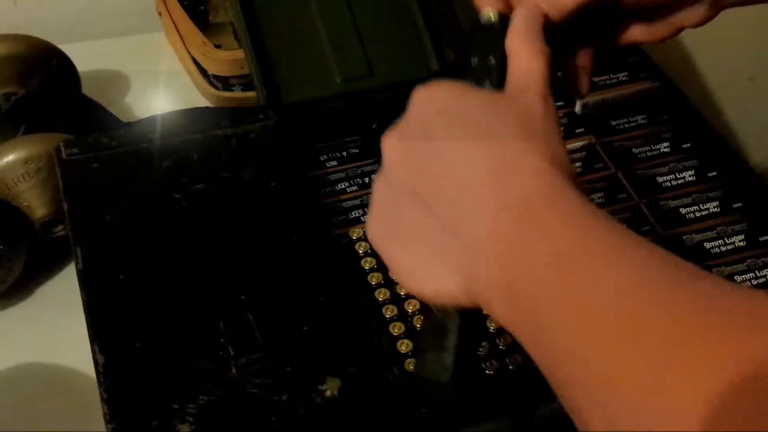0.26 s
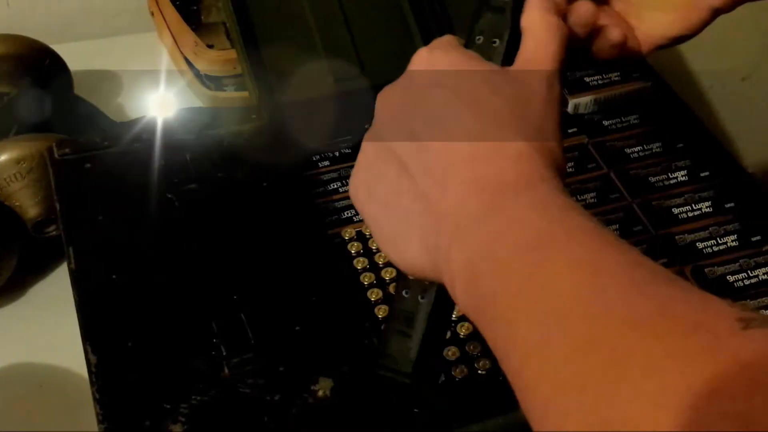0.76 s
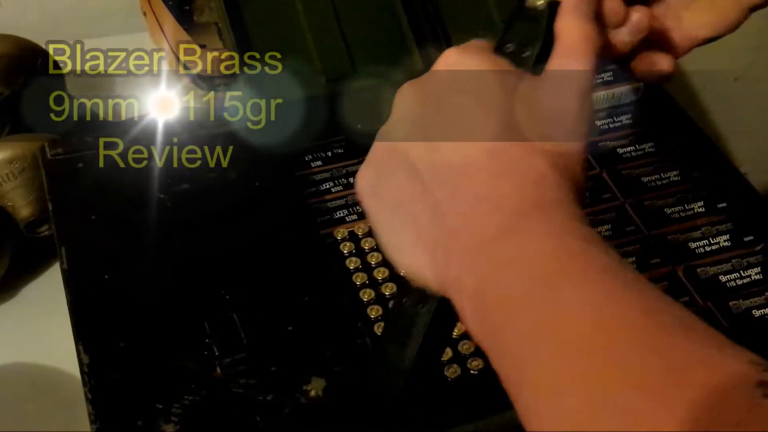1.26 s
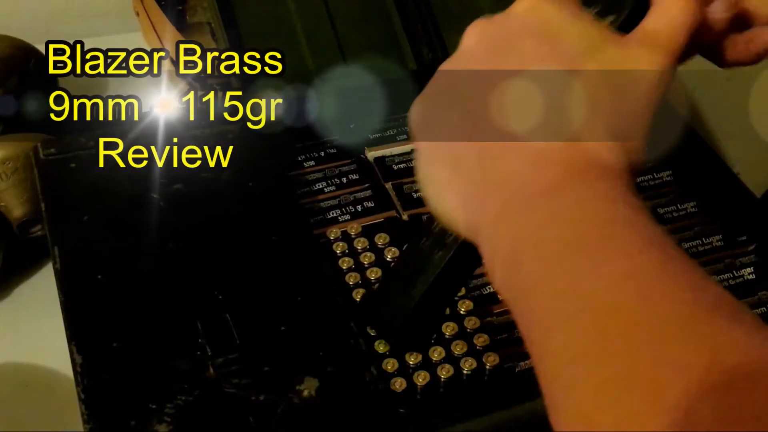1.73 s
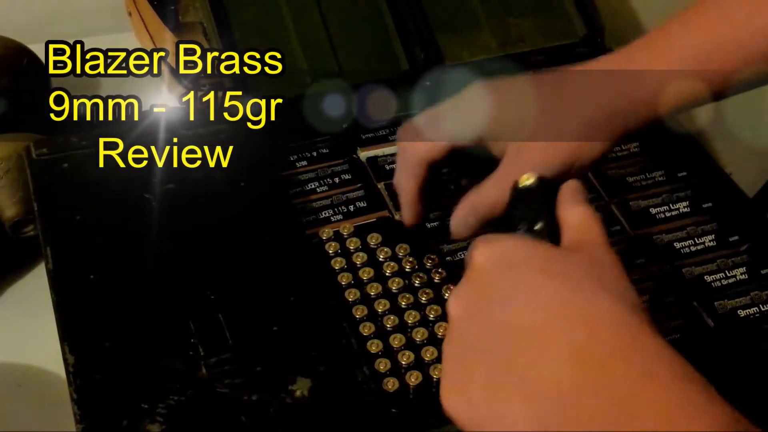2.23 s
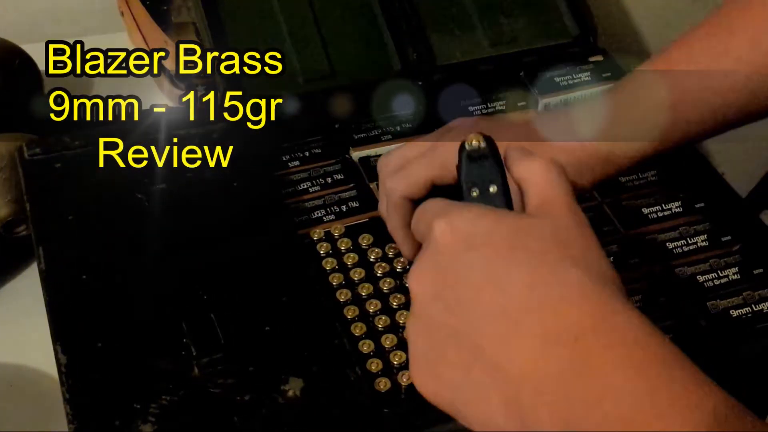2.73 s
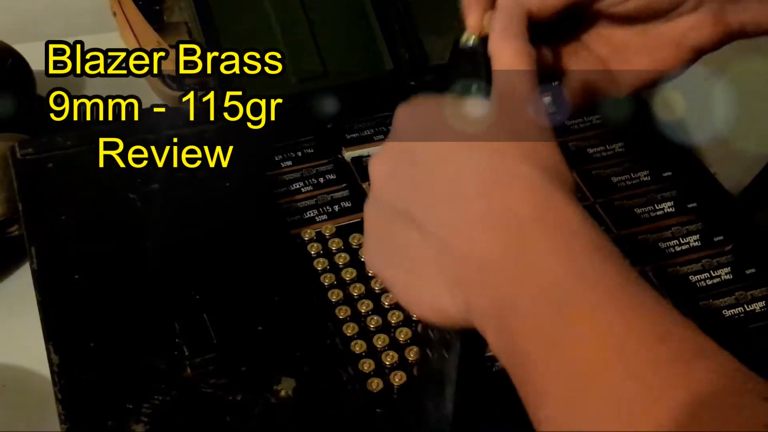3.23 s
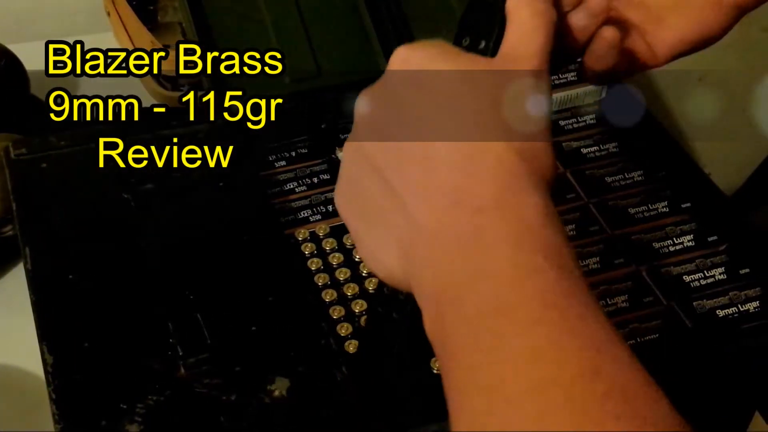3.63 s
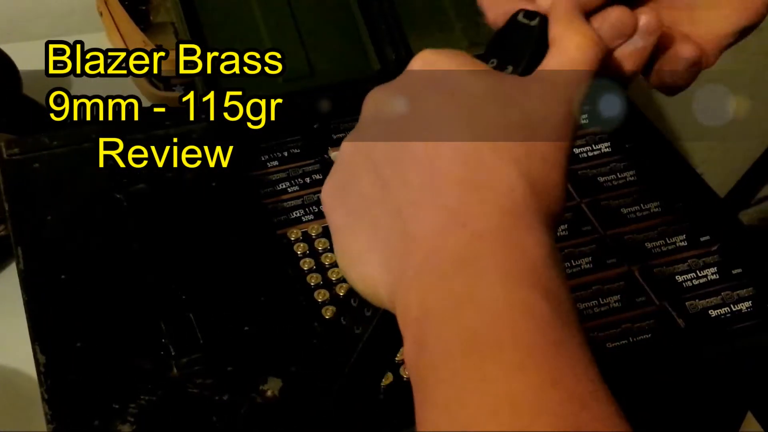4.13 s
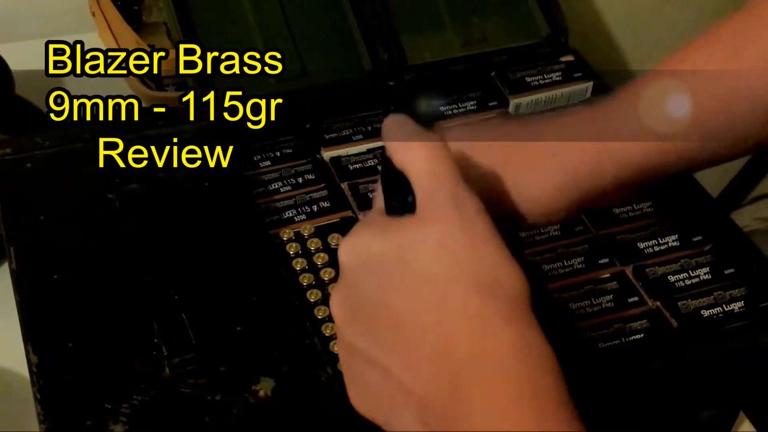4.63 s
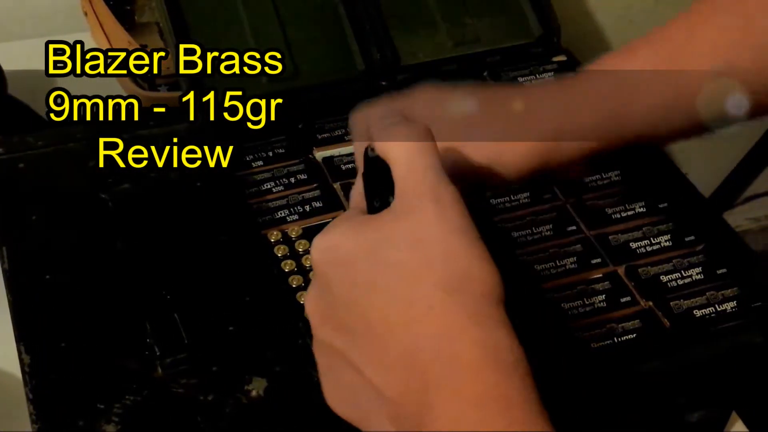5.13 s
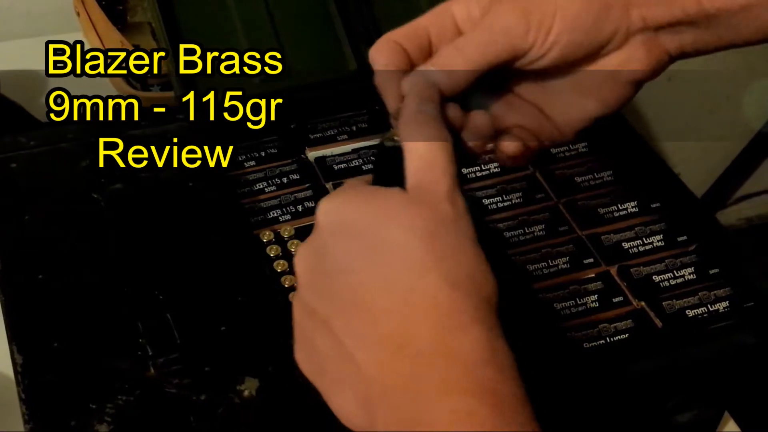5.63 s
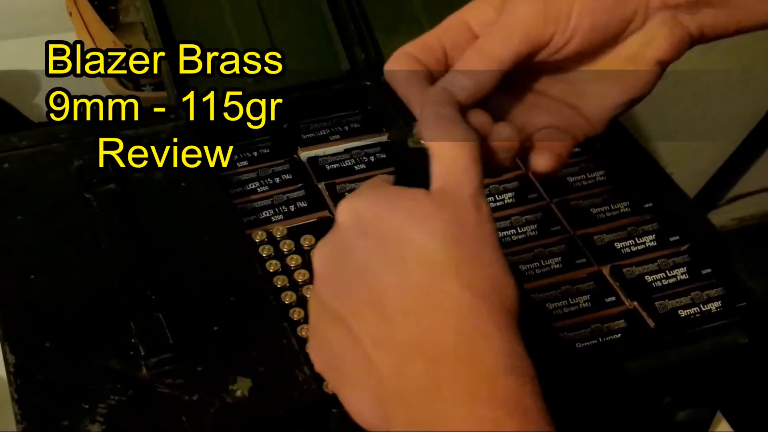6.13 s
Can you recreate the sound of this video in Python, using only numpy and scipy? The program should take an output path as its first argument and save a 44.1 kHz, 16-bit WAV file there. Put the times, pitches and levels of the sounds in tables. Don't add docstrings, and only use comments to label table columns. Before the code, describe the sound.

Brass cartridges are picked from a plastic tray and snapped into a steel pistol magazine, with irregular sharp clicks, small scrapes and short room echo.

```python
import sys
import numpy as np
from scipy import signal
from scipy.fft import rfft, irfft, next_fast_len
from scipy.io import wavfile
from scipy.ndimage import uniform_filter1d, map_coordinates

SR = 44100
rng = np.random.default_rng(int(sys.argv[2]) if len(sys.argv) > 2 else 0)


def generate_wav(sig):
    pcm = np.round(np.clip(np.atleast_2d(sig).T, -1, 1) * 32767).astype(np.int16)
    wavfile.write(sys.argv[1], SR, pcm)


def linear_from_db(decibels):
    return 10 ** (np.asarray(decibels, float) / 20)


N = 280961
PLACES = 6
BODY_HZ = 2300

# frequency in Hz, level in dB.
THUD = [(150, -25.5), (280, 0.5), (600, 0.5), (1250, -5), (1650, -22), (2500, -61.5)]
# frequency in Hz, level in dB.
BODY = [(900, -23.5), (1400, -13), (1900, -9.5), (2300, 0), (2800, -8), (3500, -11.5), (4500, -41.5),
        (7000, -68.5)]
# frequency in Hz, level in dB.
WALLS = [(2000, -58.5), (2900, -7), (3450, -0.5), (4300, 0), (5000, -1), (5700, -4.5), (6500, -8),
         (9000, -60.5)]
# frequency in Hz, level in dB.
BRIGHT = [(4000, -57), (5500, -3), (6300, -1.5), (7400, 0), (8600, 1.5), (9700, -1.5), (10800, -11.5),
          (12200, -25), (14000, -69)]


def unit(x):
    return x / np.sqrt(np.mean(x ** 2) + 1e-20)


def along(points, hz):
    f, v = np.transpose(points)
    return np.interp(np.log(hz + 1), np.log(f + 1), v)


def filtered(x, response):
    m = next_fast_len(x.shape[-1] + 8192)
    return irfft(rfft(x, m) * response(np.fft.rfftfreq(m, 1 / SR)), m)[..., :x.shape[-1]]


def paired(pair, alike):
    turn = lambda hz: np.arccos(np.clip(along(alike, hz), 0, 1)) / 2
    mid, side = filtered(pair, lambda hz: np.array([np.cos(turn(hz)), np.sin(turn(hz))]))
    return np.array([mid + side, mid - side])


def causal(gain):
    c = irfft(np.log(gain + 1e-6))
    half = c.shape[-1] // 2
    folded = np.concatenate([c[..., :1], 2 * c[..., 1:half], 0 * c[..., half:]], axis=-1)
    return np.exp(rfft(folded))


def contacts():
    # start in seconds, body level in dB,
    # walls over body in dB, hardness in dB, body pitch in Hz.
    first_round = [(0.432, -44, 3, 0.5, 2050), (0.5753, -46.5, 6, 6.5, 2140), (0.6225, -41.5, -7, -7, 3050),
                   (1.6214, -42, 5, 7.5, 2720), (1.656, -28.5, -5.5, 0.5, 2777),
                   (1.6697, -28, -0.5, 7.5, 2637), (1.842, -42.5, -16.5, 7, 2640),
                   (1.8514, -30.5, -0.5, 6, 2042), (1.9155, -51.5, 10.5, 15.5, 2570),
                   (1.9212, -32.5, -6, 1, 2600), (2.053, -35.5, 5, -4.5, 2560),
                   (2.0571, -36.5, -2.5, 13, 2716), (2.061, -39.5, -25.5, -24.5, 2826)]
    next_rounds = [(3.2614, -45.5, 2, 6.5, 2090), (3.3225, -46.5, -5, -5, 2196), (3.918, -55, 0, -7, 2430),
                   (3.943, -54, 11, 14.5, 3150), (3.9615, -57, 1.5, 14, 2407),
                   (4.277, -46.5, 8.5, 15, 2160), (4.3336, -36, -6, 4, 2310),
                   (4.3365, -34.5, 0, 11.5, 2620), (4.3405, -37.5, 2.5, 6.5, 2758),
                   (4.3422, -28, -6, 12.5, 2600), (4.35, -47.5, -1.5, 13, 2150),
                   (4.4286, -26.5, 0, 0, 2730), (4.5589, -37, 2, -7.5, 2750), (5.247, -89, 27, 23.5, 2195),
                   (5.6041, -50, 3, 13.5, 2710), (5.6029, -42, -12.5, 3, 2700),
                   (5.7346, -78.5, 8, 13, 1960)]
    # start in seconds, body level in dB,
    # hardness in dB, body pitch in Hz.
    picks = [(2.675, -56.5, -32.5, 2030), (2.6867, -52.5, -34.5, 2080), (2.691, -45, -21, 2100),
             (2.7958, -57, -38, 2160), (2.8002, -49.5, -44, 1920), (2.8061, -45, -42, 2160),
             (2.8164, -49, -26, 2220), (2.821, -47.5, -19, 2031), (2.9373, -42, -30, 2000),
             (2.9413, -36.5, -11, 2084), (2.9458, -36.5, -35, 2087), (4.7358, -52, -3.5, 2460),
             (4.739, -46.5, -7, 1820), (4.7614, -34.5, -32, 2120), (4.8914, -43, -28, 1745),
             (4.8959, -40.5, -46, 2360), (4.9018, -36.5, -58, 2230), (4.9238, -36.5, -40, 2090),
             (4.9292, -37, -38, 1980), (4.9327, -40, -15, 2310), (4.9788, -58.5, -18, 2136),
             (5.001, -56.5, -27, 2370), (5.0308, -47, -23, 2230), (5.099, -40, -12, 1540),
             (5.1019, -35, -10.5, 2570), (5.1064, -35, -23, 2510), (5.1099, -39, -38, 1830),
             (5.1159, -34, -17, 1970), (5.1453, -64, 0, 2210)]
    ticks = [(.3114, -61, -11, 1940), (.427, -87, 16, 3000), (.6275, -59, -7, 1890),
             (.6315, -44.5, -14, 1980), (.806, -49.5, -14.5, 2150), (.8938, -56.5, -30, 2040),
             (1.116, -64.5, -3, 2140), (1.1549, -60, -34, 1950), (1.3373, -64, -34, 2710),
             (1.3553, -65, -30, 1850), (1.5202, -77, -29.5, 2690), (1.5321, -57, -41, 2390),
             (1.6795, -41, -1, 2640), (1.8358, -50, 3, 2760), (1.9305, -36.5, -17, 3320),
             (2.045, -75, 3, 2115), (2.5, -66, -31, 2000), (2.5125, -57.5, -41.5, 1900),
             (2.5395, -62, -57, 2070), (2.5545, -75, -47, 2350), (3.938, -50, -6, 2682),
             (3.9404, -71, -1, 2630), (4.0573, -70, 3, 2472), (4.0881, -52.5, -9, 2470),
             (4.1576, -70, -13, 2120), (4.1778, -52, -11.5, 2550), (5.6016, -76, -15, 2670),
             (6.1173, -58.5, -21, 2603), (6.1606, -51, -15, 2446)]
    # start in seconds, thud level in dB.
    bumps = [(0.313, -57), (1.0756, -58.5), (1.6693, -44.5), (1.8359, -48.5), (2.0554, -52.5),
             (2.4189, -64), (2.67, -59), (2.691, -59), (2.778, -59.5), (3.9404, -62.5), (4.068, -55.5),
             (4.279, -48.5), (4.3355, -49.5), (4.7361, -46), (4.74, -46), (4.7633, -54), (4.8911, -59.5),
             (5.0948, -47), (5.099, -60)]
    snap_thud_db, pick_thud_db, tick_thud_db = -30.5, -17.5, -18
    pick_walls_db, tick_walls_db = 2, -2
    walls_follow = 0.39
    bump_body_db, bump_hard_db = -3.5, -21

    rows = []
    for s, db, walls_db, hard_db, hz in first_round + next_rounds:
        rows.append((s, db + snap_thud_db, db, walls_db, hard_db, hz))
    for table, thud_db, walls_db in ((picks, pick_thud_db, pick_walls_db), (ticks, tick_thud_db, tick_walls_db)):
        for s, db, hard_db, hz in table:
            rows.append((s, db + thud_db, db, walls_db + walls_follow * hard_db, hard_db, hz))
    for s, db in bumps:
        rows.append((s, db, db + bump_body_db, bump_hard_db / 2, bump_hard_db, BODY_HZ))
    s, thud_db, body_db, walls_db, hard_db, hz = np.transpose(rows)
    return s, thud_db, body_db, body_db + walls_db, body_db + hard_db, hz


def clicks():
    # frequency in Hz, level in dB.
    edge = [(9000, -58), (11000, -4), (12000, -3), (13800, -8.5), (15300, -6.5), (16200, -20.5),
            (16600, -59.5), (18000, -95.5)]
    rattle_t60 = [0.04, 0.0019, 0.012, 0.0071, 0.003]
    ring_to_walls_db = -7.5
    s, thud_db, body_db, walls_db, bright_db, body_hz = contacts()
    edge_db = bright_db - 13 + .9 * np.minimum(bright_db + 22, 0)
    level = linear_from_db(np.array([thud_db, body_db - 2, walls_db, bright_db, edge_db]).T)

    lead, size = 128, 1536
    t = (np.arange(size) - lead).clip(0) / SR
    hz = np.fft.rfftfreq(size, 1 / SR)
    colour = linear_from_db([along(part, hz) for part in (THUD, BODY, WALLS, BRIGHT, edge)])
    colour = np.repeat(colour[None], len(s), axis=0)
    colour[:, 1] = linear_from_db(along(BODY, np.outer(BODY_HZ / body_hz, hz)))

    chatter = linear_from_db(-23.5 - 60 * t / 0.09)
    decay = linear_from_db(-60 * t / np.array(rattle_t60)[:, None]) + chatter
    fade = decay * (1 - np.exp(-t / 0.0002)) * (t < .03)
    noise = rng.standard_normal((len(s), 4, 5, size)) * fade
    parts = irfft(rfft(noise) * causal(colour)[:, None], size)
    parts /= np.sqrt(np.sum(parts ** 2, -1, keepdims=True) / 130)
    rattle = np.einsum("ep,edpt->edt", level, parts)

    ring = np.sin(2 * np.pi * np.outer(body_hz, t)) * linear_from_db(-60 * t / .015) * (1 - np.exp(-(t / .0006) ** 2))
    ring = linear_from_db(body_db + 1.5)[:, None] * ring
    heard = linear_from_db(ring_to_walls_db * np.array([0, 1, 1, 1]))[:, None]
    blows = rattle + ring[:, None] * heard

    near, to_room = np.zeros(N + SR), np.zeros((PLACES, N + SR))
    for k, start in enumerate(np.round(s * SR).astype(int) - lead):
        near[start:start + size] += blows[k, 0]
        to_room[(k + np.arange(3)) % PLACES, start:start + size] += blows[k, 1:] / np.sqrt(3)
    return near[:N], to_room[:, :N]


def rings():
    snap_s = [
        1.6699,
        4.3424,
    ]
    # frequency in Hz, level in dB, t60 in seconds.
    snap_modes = [
        [(7600, -16, 0.011), (6500, -10, 0.0035), (10200, -13, .01), (2550, -32.5, 0.034), (5030, -27, .015), (8190, -21, .015), (3600, -22.5, 0.022), (12200, -23, 0.0081), (2160, -33.5, 0.01973), (14480, -30, .005)],
        [(9700, -7, 0.01294), (6170, -13, 0.011), (8420, -15, .018), (7400, -12.5, .008), (2182, -32.5, 0.032), (2750, -23.5, 0.036), (2688, -37, 0.23), (4287, -36.5, .2), (4290, -24.5, 0.024), (11900, -14, 0.0047), (15000, -22, .005), (3500, -28, 0.009)],
    ]
    # start in seconds, frequency in Hz, level in dB, t60 in seconds.
    free_rings = [(.4312, 3420, -46, 0.038), (.4312, 4170, -36, 0.02), (0.4315, 5870, -34, 0.016),
                  (0.576, 3500, -36, 0.028), (0.624, 1940, -39.5, 0.048), (0.622, 2760, -44, 0.1),
                  (.806, 5630, -53, 0.013), (1.118, 3500, -64, 0.098), (1.153, 3500, -59, 0.035),
                  (1.56, 5650, -54, .025), (1.8513, 3500, -19, 0.0099), (2.061, 3550, -36.5, 0.1),
                  (2.9408, 2116, -13, 0.0063), (2.9463, 1870, -35.5, 0.048), (3.262, 2825, -30, 0.012),
                  (3.262, 3350, -34, 0.015), (3.3235, 5400, -43.5, .015), (5.6039, 2690, -27, 0.024),
                  (5.604, 5510, -28, 0.013), (5.6047, 2220, -33, 0.015), (5.6042, 3570, -53, 0.013),
                  (5.604, 6170, -25.5, 0.012), (5.6042, 8660, -28.5, 0.0097)]
    brass_modes = [(.431, 7300, -26.5, 0.0064), (0.432, 1930, -63, 0.026), (0.43, 2660, -45, 0.033),
                   (0.5746, 8280, -34, .012), (0.624, 3740, -35.5, 0.015), (0.624, 4540, -40, 0.022),
                   (1.622, 6500, -28, 0.014), (1.622, 3800, -42, .012), (1.6546, 7300, -19, 0.018),
                   (1.6565, 9100, -29, .012), (1.8515, 9450, -10, 0.007), (1.8504, 6050, -44, 0.012),
                   (1.8535, 2660, -31, 0.023), (1.8605, 2150, -36, .03), (1.9225, 3480, -27, 0.028),
                   (1.923, 2540, -31, .025), (1.9225, 5070, -29, 0.018), (1.9305, 2070, -33, 0.024),
                   (2.052, 7600, -31, .012), (2.052, 4430, -41, 0.011), (2.0565, 7400, -20, 0.013),
                   (2.0568, 9000, -34, .012), (2.057, 8670, -16.5, 0.017), (2.061, 5900, -30, 0.017),
                   (2.0458, 10820, -34.5, .01), (3.2615, 2130, -44.5, .025), (3.2615, 6060, -39, .015),
                   (3.2608, 8670, -37, .012), (3.2611, 4970, -43, .015), (3.9428, 6490, -30.5, 0.015),
                   (4.278, 6760, -27, 0.013), (4.2775, 11800, -28, .006), (4.2775, 16300, -37, .005),
                   (4.2775, 9700, -31, .008), (4.3363, 10000, -14, .007), (4.429, 4180, -21, 0.0099),
                   (4.429, 5400, -21, .008), (4.429, 2190, -29, 0.022), (4.558, 2750, -36, 0.02),
                   (4.5586, 4290, -39, 0.0089), (5.6034, 4640, -38.5, 0.018), (5.605, 7040, -46, 0.012)]
    hollow_knocks = [(1.0748, 1000, -44, 0.0081), (2.9415, 750, -48, 0.026), (0.6315, 2050, -60.5, 0.38),
                     (2.417, 570, -44, 0.01), (2.675, 2050, -46.5, .012), (2.8065, 2100, -32.5, .015),
                     (2.837, 2050, -38, 0.02), (2.942, 4300, -26.5, 0.0087), (2.941, 3200, -32, 0.012),
                     (2.946, 1930, -33, .025), (3.966, 550, -52.5, 0.032), (4.068, 690, -51.5, .02),
                     (4.76, 650, -40, 0.052), (4.9325, 2040, -22.5, 0.01), (5.0308, 2370, -32, 0.0099),
                     (5.1025, 1890, -24.5, 0.015), (5.1025, 2750, -24.5, 0.023), (5.1025, 4100, -31, 0.021)]
    more_modes = [(1.0748, 490, -41.5, 0.011), (1.0752, 2120, -53, 0.026), (1.148, 2290, -49, 0.011),
                  (1.357, 1890, -55, 0.018), (1.517, 600, -57, 0.019), (1.538, 2690, -55.5, 0.016),
                  (1.574, 6250, -56, 0.022), (1.586, 5850, -59, .015), (1.578, 2630, -52, 0.024),
                  (1.587, 2000, -60, .015), (1.844, 9700, -28, 0.0072), (1.9158, 8100, -20, 0.0081),
                  (1.9225, 6900, -33, 0.0073), (1.9225, 11600, -30, 0.011), (1.8515, 11550, -17.5, 0.0069),
                  (2.0615, 8820, -24.5, .012), (2.428, 690, -56, 0.042), (2.5, 2200, -53, .012),
                  (2.555, 2200, -51, .012), (2.695, 2200, -36.5, .012), (2.817, 2000, -36, .01),
                  (2.937, 2100, -35.5, 0.01), (5.102, 7600, -34, 0.0087), (5.102, 7100, -40, 0.0082),
                  (5.252, 8100, -45, .02), (5.259, 8260, -45, 0.017), (5.265, 7960, -59, .02),
                  (5.7336, 6990, -37, 0.0075), (5.7336, 5870, -41, 0.0095), (5.6042, 2736, -46, 0.35),
                  (5.6042, 3531, -48, 0.11), (5.6042, 1436, -60, 0.15), (4.3369, 12900, -22, 0.0059),
                  (1.6217, 10000, -22.5, 0.0062), (1.657, 11400, -28.5, 0.013), (3.9426, 8100, -42, .01),
                  (5.6042, 2100, -56.5, 0.22), (5.6042, 4960, -51, 0.14), (2.8215, 2000, -38, 0.014),
                  (2.687, 2000, -34, .01)]
    # start in seconds, peak in dB, frequency in Hz.
    jostle = [(4.7383, -41, 2460), (4.7488, -29.5, 1900), (4.7623, -37, 2190), (4.897, -39, 2340),
              (4.902, -27, 2340), (4.9327, -37, 2000), (4.9445, -29, 2050), (4.9763, -30, 1970),
              (4.9987, -36, 1960), (5.0302, -34, 1976), (5.1025, -15, 2190), (5.1066, -24, 2060),
              (5.1108, -20.5, 1950)]
    fumble = [
        (4.0608, -46.5, 2380),
        (4.1581, -46.5, 2110),
    ]
    jostle_db, jostle_t60_s = -3, 0.012
    snap_attack_s, tick_attack_s = .00006, .0004

    snaps = [(s, *mode) for s, modes in zip(snap_s, snap_modes) for mode in modes]
    knocks = [(s, hz, db + jostle_db, jostle_t60_s) for s, db, hz in list(jostle) + list(fumble)]
    modes = snaps + free_rings + brass_modes + hollow_knocks + more_modes + knocks
    out, t = np.zeros(N + SR), np.arange(SR // 2) / SR
    for k, (s, hz, db, t60) in enumerate(modes):
        attack_s = snap_attack_s if k < len(snaps) else tick_attack_s
        tone = linear_from_db(db - 60 * t / t60) * np.sin(2 * np.pi * hz * t)
        out[round(s * SR):][:len(t)] += tone * (1 - np.exp(-t / attack_s))
    return out[:N]


def scrapes():
    # start in seconds, length in seconds, body level in dB, hardness in dB, weight of the hand in dB.
    strokes = [(.3, 0.049, -75, -7, -8), (1.105, 0.028, -66.5, -12, -7), (1.14, 0.019, -61.5, -20, -14.5),
               (1.33, 0.06, -59, -14, -18.5), (1.51, 0.37, -58.5, -7.5, -10), (1.652, 0.063, -38, -4, -19),
               (2.054, 0.045, -42.5, 6.5, -17), (2.4, 0.042, -66, -4, 3.5), (2.67, 0.068, -57, -28, 6),
               (2.81, 0.066, -58, -15, -5), (4.05, 0.08, -54.5, 0, -8), (4.15, 0.07, -57.5, -1.5, -4.5),
               (4.24, 0.055, -67, 3.5, 1.5), (4.745, 0.051, -38, -8, -4.5),
               (4.888, 0.074, -47.5, -2.5, 4.5), (4.93, 0.25, -54, -9.5, 1), (5.245, 0.052, -63.5, 11.5, 4),
               (6.13, 0.11, -87, -14, -25.5)]
    # frequency in Hz, level in dB.
    plastic = [(1000, -34), (1450, -2.5), (1950, -4.5), (2150, 4), (2600, -4.5), (3400, -17), (4500, -34),
               (7000, -73.5)]
    firmest, ease_db = 0.31, -11.5
    t, out = np.arange(N) / SR, np.zeros((PLACES, N))
    slips = (rng.random(N) < .04) * linear_from_db(4 * rng.exponential(size=N).clip(0, 2))
    grains = rng.standard_normal(N) * (.3 + slips)
    grains = grains * linear_from_db(4 * map_coordinates(rng.standard_normal(600), [t * 90]))
    thud, body, walls, bright = [unit(filtered(grains, lambda hz: linear_from_db(along(part, hz))))
                                 for part in (THUD, plastic, WALLS, BRIGHT)]
    for k, (s, length, db, hard_db, hand_db) in enumerate(strokes):
        touch = np.clip(np.minimum(t - s, s + length - t) / 0.0086, 0, 1)
        press_db = np.interp((t - s) / length, [0, firmest, 1], [ease_db, 0, ease_db])
        rub = linear_from_db(hand_db) * thud + body + 0.22 * walls + linear_from_db(hard_db) * (bright + 0.45 * walls)
        out[k % PLACES] += touch * linear_from_db(db + press_db - 6.5) * rub
    return out


def spring():
    # start in seconds, level in dB, t60 in seconds.
    shivers = [
        (1.673, -40, 0.39),
        (1.852, -44, 0.27),
        (2.059, -59, 1),
        (4.345, -28, 0.65),
    ]
    # frequency in Hz, level in dB.
    coils = [(4500, -39), (6200, -3.5), (7300, -8), (8600, -1.5), (9600, -6), (10800, -18), (12500, -25.5),
             (16000, -50.5)]
    t = np.arange(N) / SR
    hits = (rng.random(N) < .02) * linear_from_db(4 * rng.exponential(size=N).clip(0, 2))
    grains = rng.standard_normal(N) * (.6 + hits)
    wash = unit(filtered(grains, lambda hz: linear_from_db(along(coils, hz))))
    swell = np.zeros(N)
    for s, db, t60 in shivers:
        swell += linear_from_db(db - 60 * (t - s).clip(0) / t60) * ((t - s) / 0.0087).clip(0, 1)
    return wash * swell


def fading():
    earlier = np.zeros(N)
    earlier[:400] = linear_from_db(-41.5) * rng.standard_normal(400)
    return filtered(earlier, lambda hz: linear_from_db(along(BODY, hz)) + 0.041 * linear_from_db(along(WALLS, hz)))


def echoed(x):
    # delay in seconds, level in dB.
    echoes = [
        (.0038, -12.5),
        (.0083, -12),
    ]
    return x + sum(linear_from_db(db) * np.pad(x, (round(s * SR), 0))[:N] for s, db in echoes)


def room(places):
    # frequency in Hz, t60 in seconds.
    decay = [(500, 0.79), (1300, 0.72), (2200, 0.66), (4000, 0.6), (6500, 0.43), (9000, 0.38),
             (13000, 0.28), (16000, .36)]
    # frequency in Hz, level against the direct sound in dB.
    gain = [(400, -0.5), (2000, 0.5), (5000, -2.5), (10000, -6)]
    # frequency in Hz, left-right likeness from 0 to 1.
    alike = [(200, .9), (600, 0.85), (1650, 0.93), (5000, 0.92), (13000, 0.16)]
    out = np.zeros((2, N))
    for x in places:
        hz, t, z = signal.stft(rng.standard_normal((2, SR * 3 // 4)), SR, nperseg=256)
        t60 = along(decay, hz)[:, None]
        energy_one = np.sqrt(2 * np.log(1000) / t60 / SR)
        shape = linear_from_db(along(gain, hz)[:, None] - 60 * t / t60) * energy_one
        tail = paired(signal.istft(z * shape, SR, nperseg=256)[1], alike)
        tail *= 1 - np.exp(-(np.arange(tail.shape[1]) / SR / 0.0059) ** 2)
        out += signal.fftconvolve(x[None], tail, axes=1)[:, :N]
    return out


def ports(x, lean):
    # frequency in Hz, left-right level in dB.
    level = [(200, -2), (600, -3.5), (1400, -6), (2500, -4), (5000, -2.5), (9000, -2), (13000, 3)]
    # frequency in Hz, phase between the ports in radians.
    lag = [(8000, 0), (10000, .4), (11500, .9), (13000, 1.3), (16000, 1.6)]
    half = np.array([.5, -.5])[:, None]
    return filtered(x, lambda hz: linear_from_db(lean * half * along(level, hz)) * np.exp(1j * half * along(lag, hz)))


def hushed(x):
    # frequency in Hz, threshold in dB a band.
    threshold = [(1000, -112), (2500, -108), (5000, -97.5), (8000, -91), (12000, -90)]
    steepness = 2.5
    hz, _, z = signal.stft(x, SR, nperseg=256)
    power = uniform_filter1d(np.mean(np.abs(z) ** 2, 0), size=5, axis=0)
    power = np.abs(uniform_filter1d(power, size=7, axis=1))
    keep = (power / (power + linear_from_db(2 * along(threshold, hz))[:, None])) ** steepness
    return signal.istft(z * keep, SR, nperseg=256)[1][:, :N]


def house():
    # frequency in Hz, level in dB per Hz.
    floor = [(12, -19.5), (20, 6.5), (37, 1), (142, -8.5), (234, -9), (459, -15), (624, -17.5),
             (678, -18.5), (849, -21.5), (1810, -24), (2910, -29.5), (3950, -31.5), (11400, -39),
             (16000, -58)]
    # frequency in Hz, left-right likeness from 0 to 1.
    alike = [(40, .86), (200, .82), (550, .55), (1650, .35), (5000, .15)]
    # time in seconds, rumble level in dB.
    rumble = [(0.3, -64.5), (0.52, -62.5), (1.03, -70.5), (2.7, -63.5), (3.74, -66.5), (4.76, -66.5),
              (4.96, -62.5), (5.28, -64), (5.71, -66.5), (6.3, -65)]
    # centre in Hz, width in Hz, level in dB.
    hum = [
        (119, 59, -74.5),
        (242, 10, -73),
    ]
    floor_db, patchy_db = -61.5, 1.6
    rumble_top_hz, hiss_top_hz, hiss_shelf_db = 595, 13260, 0.5
    t = np.arange(N) / SR

    air = filtered(rng.standard_normal((2, N)),
                   lambda hz: linear_from_db(along(floor, hz)) * linear_from_db(hiss_shelf_db * (hz > hiss_top_hz)))
    z = signal.stft(air, nperseg=1024)[2]
    patches = uniform_filter1d(rng.standard_normal(z.shape[1:]), size=5, axis=0)
    patches = uniform_filter1d(patches, size=11, axis=1)
    air = signal.istft(z * linear_from_db(patchy_db * unit(patches)), nperseg=1024)[1][:, :N]

    s, swell_db = np.transpose(rumble)
    wander_db = 0.87 * map_coordinates(rng.standard_normal(60), [t * 4])
    swell = linear_from_db(np.interp(t, s, swell_db - swell_db.mean()) + wander_db) - 1
    air = air + swell * filtered(air, lambda hz: 1 / (1 + (hz / rumble_top_hz) ** 4))
    drift_db = map_coordinates(rng.standard_normal(60), [t * 5])
    out = linear_from_db(floor_db + drift_db) * unit(paired(air, alike))
    for centre, width, db in hum:
        resonance = lambda hz: 1 / (1 + (2 * (hz - centre) / width) ** 2)
        out += linear_from_db(db) * unit(filtered(rng.standard_normal(N), resonance))
    return out


def scene():
    tone_to_walls_db = -4.5
    room_lean = 0.5
    (near, to_room), rub, tones = clicks(), scrapes(), rings()
    to_room = to_room + linear_from_db(tone_to_walls_db) * tones / np.sqrt(PLACES)
    direct = ports(echoed(near + tones) + spring() + rub.sum(0), 1)
    answer = ports(room(to_room + rub + fading()), room_lean)
    return hushed(direct + answer) + house()


def top_cut(x):
    return signal.sosfilt(signal.butter(12, 17130, fs=SR, output="sos"), x)


def record(dry):
    top, start_s = .93, .0965
    soft = dry / (1 + np.abs(dry / top) ** 6) ** (1 / 6)
    soft = filtered(soft, lambda hz: 1 / (1 + (hz / 16900) ** 60))
    return top_cut(soft * (np.arange(N) > start_s * SR))


dry = scene()
out = record(dry)
generate_wav(out)
```